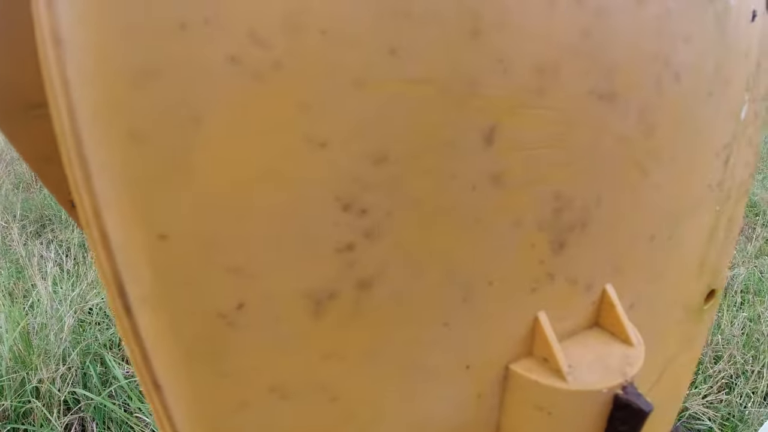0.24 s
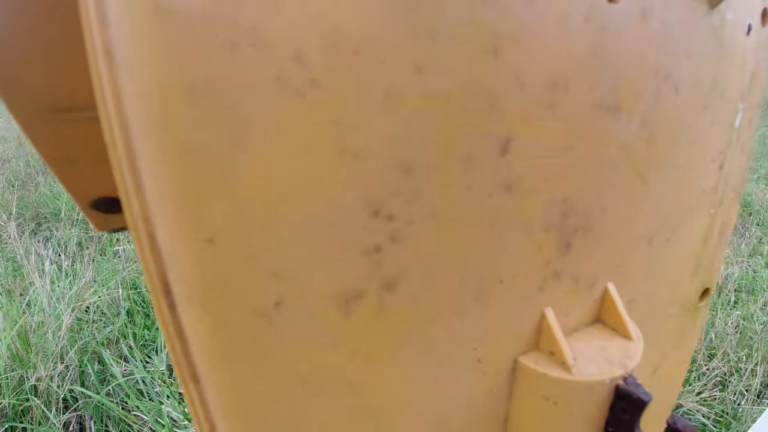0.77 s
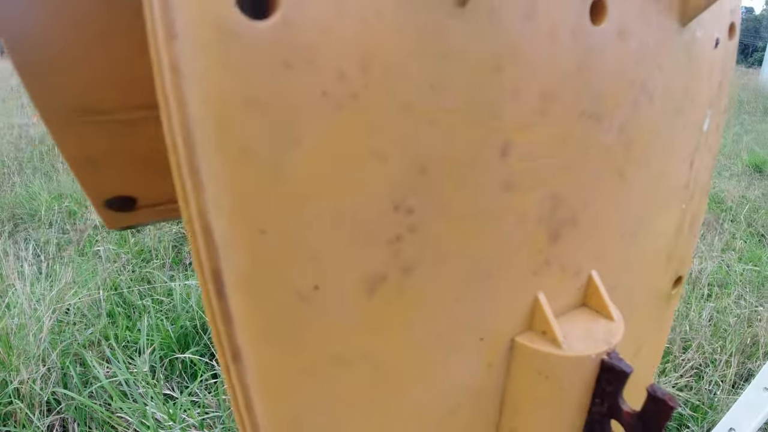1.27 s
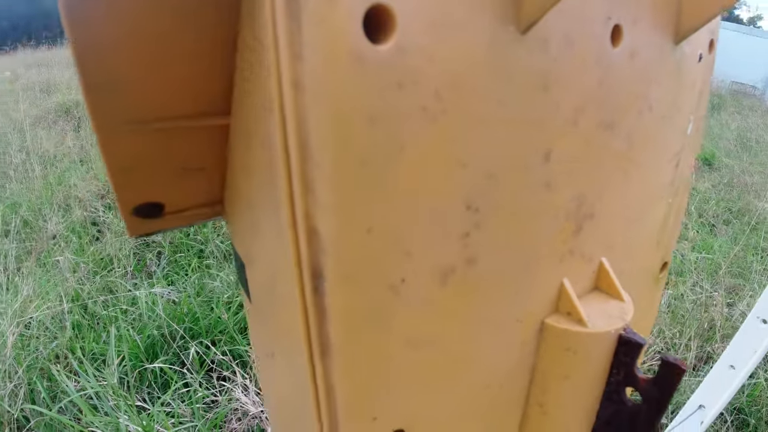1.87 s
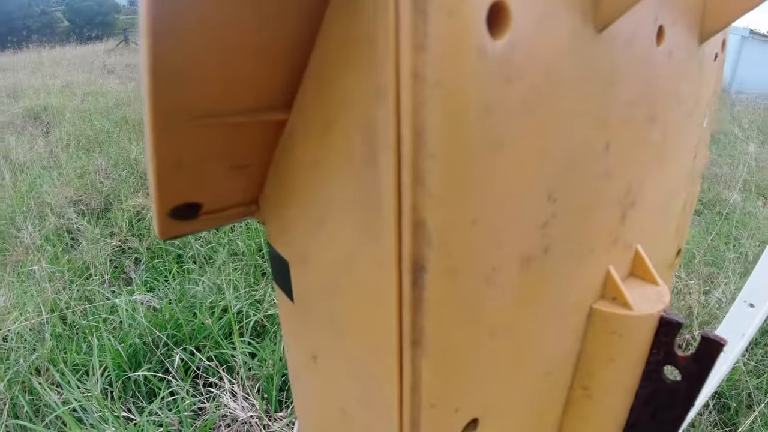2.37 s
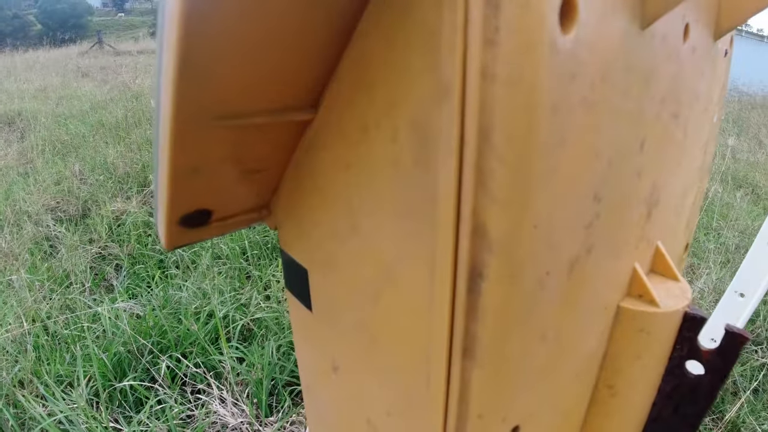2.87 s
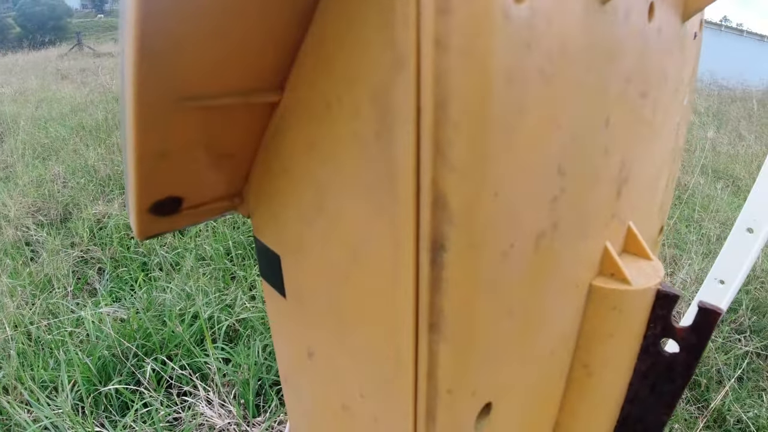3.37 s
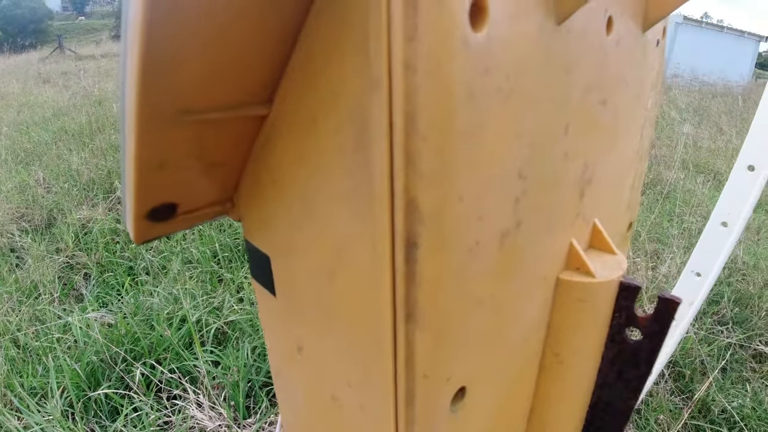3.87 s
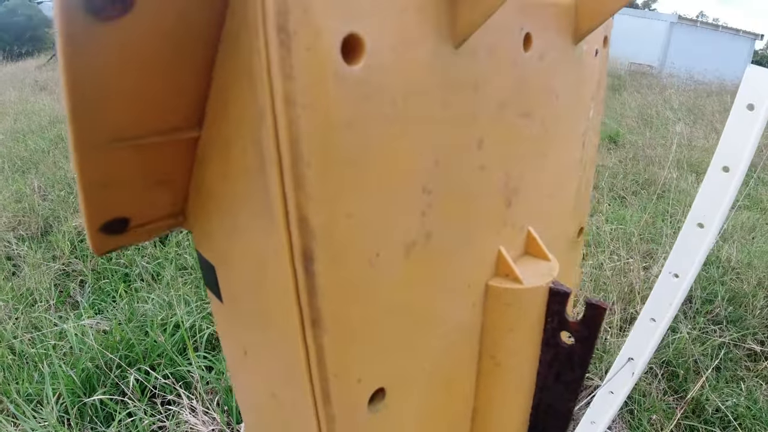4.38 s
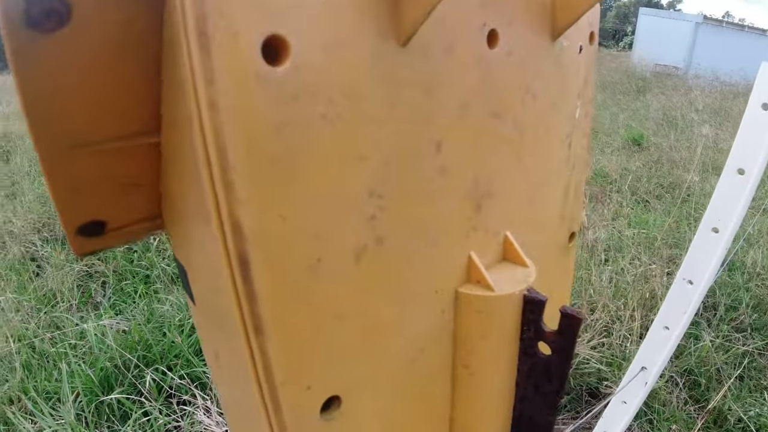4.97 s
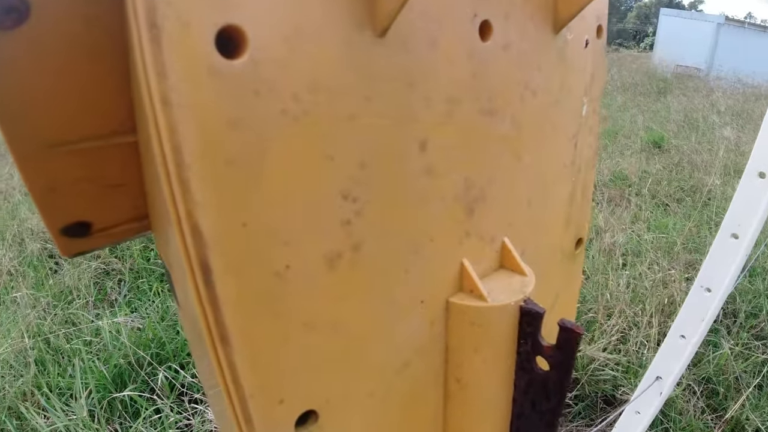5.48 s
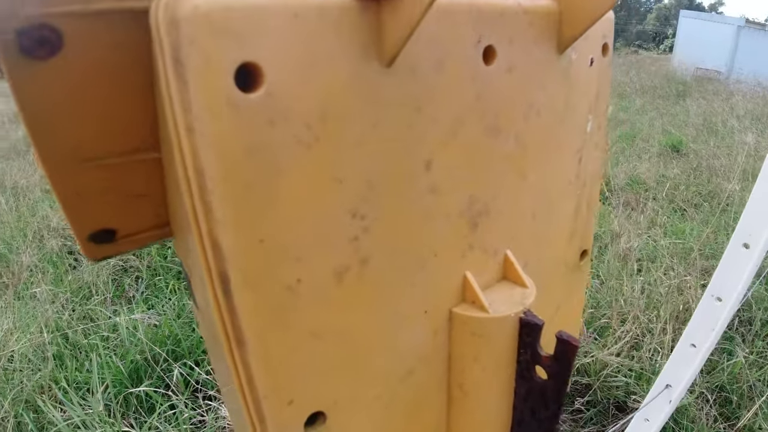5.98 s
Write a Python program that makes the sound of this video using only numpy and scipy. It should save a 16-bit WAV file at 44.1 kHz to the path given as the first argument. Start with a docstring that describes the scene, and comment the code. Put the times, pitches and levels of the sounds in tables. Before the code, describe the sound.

Close, dry electrical arcing in a hollow plastic case, outdoors in an open paddock with low wind rumble, soft air hiss and a faint low hum. From 0 to 0.9 seconds pops and bright cracks crowd together, single or in quick stutters of two to five strikes, with tiny ticks and sizzle trailing. From 1 to 2.4 they come in looser clusters with gaps; faint bird notes glide far off around 1.7 and 2.2. Stronger boxy pops fall between 2.4 and 3.3, with wind gusts at 2.7 and 3.2. It is nearly quiet until 3.9, only faint fizz and stray ticks. At 4.1 a dull low bump knocks the microphone amid hard double snaps. Dense, uneven crackling follows to 5.5, with gusts and a faint bird chirp near 5.1. Sparks thin, then the loudest pop strikes near 6.05 and a last one at 6.2.

```python
"""Wind rumble, a low hum and a faint fizz open the scene, and at once sparks pop close by.
An electric fence energiser arcs inside its hollow plastic case: pops and bright cracks, single or in
stuttering runs, are filtered noise and impulses driven through the resonances of the case.
Ticks and sizzle trail the sparks; wind, air and hum are coloured noise around them in the paddock.
A far bird gives thin gliding whistles, and decaying low sines knock the microphone in a single bump."""
import sys
import numpy as np
from scipy import signal
from scipy.fft import rfft, irfft, next_fast_len
from scipy.io import wavfile
from scipy.ndimage import map_coordinates

SR = 44100
rng = np.random.default_rng(int(sys.argv[2]) if len(sys.argv) > 2 else 0)


def store_wav(level_fs):
    """Save 16-bit WAV to argv[1]."""
    pcm = np.round(np.clip(np.atleast_2d(level_fs), -1, 1) * 32767)
    wavfile.write(sys.argv[1], SR, pcm.T.astype(np.int16))


N = 275184  # length in samples
RING = 8192  # samples in one ringing burst, also points in a random curve


def amp(db):
    """Level in dB as an amplitude factor."""
    return 10 ** (np.asarray(db) / 20)


def unit(x):
    """Scale to rms 1."""
    return x / np.sqrt(np.mean(x ** 2) + 1e-20)


def curves(rows):
    """One value per sample for each column after the time."""
    times, *columns = np.transpose(rows)
    return [np.interp(np.arange(N) / SR, times, column) for column in columns]


def filtered(x, response):
    """Filter x by a complex response of frequency."""
    size = next_fast_len(N + SR // 2)
    f = np.fft.rfftfreq(size, 1 / SR)
    return irfft(rfft(x, size) * response(f), size)[:N]


def noise(spectrum):
    """Noise of rms 1, coloured by straight lines over log frequency."""
    hz, db = np.transpose(spectrum)
    colour = lambda f: amp(np.interp(np.log(f + 1), np.log(hz + 1), db))
    return unit(filtered(rng.standard_normal(N), colour))


def wobble(per_second):
    """A smooth curve through so many random points a second."""
    return map_coordinates(rng.standard_normal(RING), [np.arange(N) * per_second / SR])


def resonance(f, hz, width):
    """Causal response of one damped mode."""
    return 1j * f * width / (hz * hz - f * f + 1j * f * width)


def add(track, s, sound):
    """Mix a sound in at s seconds."""
    start = max(round(s * SR), 0)
    room = track[start:start + len(sound)]
    room += sound[:len(room)]


def burst(spectrum):
    """The waveform of a spectrum, with the energy of 10 ms at rms 1."""
    wave = irfft(spectrum)
    return wave / np.sqrt(np.sum(wave ** 2) / (SR / 100))


# gusts on the microphone: [peak t/s, level over the breeze/dB, half-length t/s]
GUSTS = [(2.74, 11, 0.16), (3.17, 11.5, 0.049), (4.227, 12, 0.11), (4.712, 12.5, 0.086), (5.119, 14, .06),
         (5.736, 13, 0.16)]


def wind_strength(breeze_db=-35.5):
    """A steady breeze in dB, on which each gust swells and falls as a bell."""
    t = np.arange(N) / SR
    return breeze_db + sum(db * np.exp(-((t - s) / half) ** 2) for s, db, half in GUSTS)


# colour of the wind on the microphone: [f/Hz, relative level per Hz/dB]
WIND_COLOUR = [(4, -8.5), (11, -13), (22, -15.5), (33, -20), (45, -23.5), (62, -35.5), (140, -40),
               (260, -51), (600, -57), (2000, -130)]
# colour of the open air: [f/Hz, relative level per Hz/dB]
AIR_COLOUR = [(60, -9), (180, 5), (280, -6), (600, -5.5), (950, -8), (1400, -12.5), (2200, -14),
              (3400, -21), (5000, -21.5), (5800, -27), (8000, -36), (10000, -34.5), (13000, -27.5),
              (16000, -41)]


def paddock(air_db=-53, hum_hz=103, hum_width=6, hum_db=-52):
    """Wind rumble and open-air hiss are coloured noise; narrow-band noise makes a wavering hum."""
    wind = amp(wind_strength()) * noise(WIND_COLOUR)
    hum = unit(filtered(rng.standard_normal(N), lambda f: resonance(f, hum_hz, hum_width) ** 2))
    return wind + amp(air_db) * noise(AIR_COLOUR) + amp(hum_db) * hum


# resonances of the case and the air in it: [f/Hz, width f/Hz, relative level/dB]
CASE = [(195, 30, 4.35), (369, 28.5, 4.5), (473, 18, -4), (547.4, 24.5, 3), (680.3, 27.1, -3),
        (837.6, 45, -4.5), (941, 48.5, 0), (1063.5, 53, 1.17), (1135, 14, -17), (1290, 34, -5),
        (1481.5, 37, -7), (1850, 180, -17.5), (1789, 64, -2.5), (2066, 142, -0.5), (2249, 86, -1),
        (2723, 140, -14), (2720, 64, -11.5), (3262, 143, -5.5), (3825, 173, -11.5), (4290, 110, -16.5),
        (4926, 174, -14.5), (5940, 500, -40), (6430, 280, -27.5), (7120, 350, -34), (8420, 380, -31),
        (11200, 170, -38)]


def case_modes(f):
    """Damped modes of the case, one row each; neighbours move in opposite senses."""
    return np.array([(-1) ** k * amp(db) * resonance(f, hz, width)
                     for k, (hz, width, db) in enumerate(CASE)])


def crackle(per_second, life, steady, thin_hz, dull_hz):
    """Random noise grains, life seconds long, on a steady hiss, coloured by the case; rms 1."""
    starts = rng.random(N) < per_second / SR
    sizes = np.minimum(rng.exponential(size=N), 3)
    grains = steady + signal.lfilter([1], [1, -np.exp(-1 / (life * SR))], starts * sizes)

    def colour(f):
        low_cut = (1j * f / (thin_hz + 1j * f)) ** 3
        return case_modes(f).sum(0) * low_cut / (1 + (f / dull_hz) ** 4)

    return unit(filtered(grains * rng.standard_normal(N), colour))


# fizz between the sparks: [t/s, level before the fizz_db trim/dB]
FIZZ = [(0, -55), (.8, -51), (1.35, -60), (2.1, -54.5), (3.5, -61), (4.2, -52), (4.5, -61), (6.24, -58.5)]


def fizz(fizz_db=-3):
    """Tiny discharges sizzle in the case between the sparks."""
    level_db = curves(FIZZ)[0] + fizz_db
    return amp(level_db) * crackle(per_second=60, life=0.00085, steady=0.14, thin_hz=2940, dull_hz=6400)


# single sparks: [t/s, pop level over 10 ms/dB, pop f/Hz, crack level over 10 ms/dB]
SPARKS = [(.02, -18.5, 590, -34), (.0353, -29, 2400, -41), (.0498, -19.5, 930, -38.5),
          (.0646, -25, 900, -33), (.1014, -15.5, 690, -43), (.1377, -39, 3250, -40),
          (.1577, -14, 680, -26.5), (.269, -19, 650, -50), (.2925, -20, 670, -30.5),
          (.3489, -23, 1900, -49), (.5874, -18, 1320, -75), (.6021, -18.5, 1550, -37),
          (.773, -27, 1890, -38.5), (1.0522, -27, 625, -36.5), (1.0723, -33, 1620, -43.5),
          (1.1032, -42, 2180, -46), (1.1282, -28, 1300, -43), (1.1827, -18.5, 620, -29.5),
          (1.2018, -29, 1930, -35), (1.6404, -21, 710, -33.5), (1.6616, -17.5, 770, -30),
          (2.076, -22.5, 918, -46), (2.1442, -41, 2590, -46), (2.2738, -44.5, 3470, -64),
          (2.3744, -14, 856, -65), (2.3936, -25.5, 1270, -66), (2.635, -12.5, 830, -37.5),
          (2.668, -24, 1800, -45.5), (2.7775, -23.5, 1100, -44), (2.8156, -21, 745, -39),
          (2.912, -11, 1046, -34.5), (2.9542, -21.5, 2320, -40), (3.1173, -22.5, 760, -39),
          (3.1466, -27.5, 1070, -47), (3.1629, -27, 2070, -38), (3.2051, -22, 1970, -50),
          (3.281, -15.5, 735, -29.5), (3.3372, -36, 2770, -52), (3.8761, -43.5, 3200, -43),
          (4.013, -17, 820, -43), (4.0574, -25, 1520, -46), (4.3202, -16.5, 830, -39.5),
          (4.386, -24.5, 2010, -46), (4.7187, -24, 1020, -44), (4.822, -32.5, 2000, -47),
          (4.8885, -11, 1055, -33.5), (4.9238, -23, 2050, -47), (5.0708, -20.5, 826, -42),
          (5.1508, -13.5, 755, -37.5), (5.1775, -21, 1590, -46), (5.1978, -17.5, 626, -33.5),
          (5.2149, -22.5, 2180, -48), (5.2458, -19, 700, -36.5), (5.6324, -21.5, 710, -40.5),
          (5.6641, -34.5, 1660, -46), (5.706, -17.5, 985, -42), (5.8474, -26.5, 1550, -41),
          (5.9656, -13.5, 867, -54), (6.0537, -7.5, 833, -32), (6.2113, -13, 527, -33)]
# stuttering runs, in which the arc strikes again and again: [t/s, strikes, gap t/s,
# first pop level/dB, level swell per strike/dB, first pop f/Hz, crack level/dB]
RUNS = [(0.1797, 4, .0101, -14.5, 1.4, 670, -36.5), (.436, 2, .007, -16, 5, 880, -35),
        (0.4665, 5, .008, -18.5, -0.14, 910, -32.5), (0.5347, 2, .007, -17.5, 4.5, 830, -37.5),
        (0.676, 2, .006, -14, -3, 734, -34), (0.7273, 2, .0102, -21, 6.5, 800, -38.5),
        (0.815, 2, 0.0091, -20, 2, 980, -41.5), (1.232, 3, .0124, -15.5, .5, 800, -36),
        (1.5657, 2, 0.009, -22.5, 0, 1540, -49), (1.6764, 2, 0.00714, -11, -10, 635, -44),
        (1.8595, 2, .0075, -20.5, -3, 910, -46.5), (2.4731, 2, .0137, -19.5, 0, 996, -50.5),
        (4.1049, 2, 0.00443, -12, -2, 727, -33.5), (4.1246, 2, .008, -14, -21, 760, -35),
        (4.1723, 3, .008, -15, -1.5, 674, -42), (4.2323, 2, 0.018, -12, -11.5, 610, -37.5),
        (4.2811, 2, .0045, -11.5, -8.5, 648, -35), (4.5357, 2, .0095, -23.5, 9.5, 757, -41.5),
        (4.5581, 2, .0105, -13.5, -6.5, 705, -38), (4.6161, 2, .0153, -15, -2.5, 700, -32.5),
        (4.7864, 2, 0.00788, -17, 2.5, 944, -50), (4.9514, 3, .0115, -17.5, 1, 893, -38),
        (5.293, 2, .0114, -18, 0.5, 780, -35), (5.4118, 4, .0064, -26.5, 5.5, 830, -34),
        (5.4386, 4, .012, -17, -2, 920, -37.5), (5.7545, 2, .013, -21.5, 1.5, 1400, -42.5),
        (6.0144, 2, .0134, -12.5, -6, 646, -38)]


def strikes(climb=1.084):
    """Every breakdown of the gap; a run repeats evenly, each pop higher by the climb ratio."""
    repeated = [(s + k * gap, db + k * swell_db, hz * climb ** k, crack_db)
                for s, count, gap, db, swell_db, hz, crack_db in RUNS
                for k in range(round(count))]
    return SPARKS + repeated


# sharpness of a pop whose level equals its crack: [pop f/Hz, base Q]
SHARPNESS = [(500, 1.36), (740, 1.46), (950, 2.6), (1400, 1.28), (2300, 2.3)]


def sharpness(hz, over_crack_db, soft_rings=0.16):
    """Q of a pop: an abrupt spark with a strong crack is broad, a soft one rings."""
    base_q = np.interp(hz, *np.transpose(SHARPNESS))
    return base_q * amp(soft_rings * over_crack_db)  # soft_rings in dB of Q per dB over the crack


def sparks(scatter_db=3.0, sputter_life=0.005, sputter_db=-10, crack_life=0.0017, crack_hz=3600,
           crack_top_hz=8000, leak_db=-10.0, leak_hz=1150, leak_width=1100, dull_hz=9000, steep=1.316):
    """Each spark is a short pop of heated air plus a bright crack, both heard through the case."""
    f, t = np.fft.rfftfreq(RING, 1 / SR), np.arange(RING) / SR
    modes, out = case_modes(f), np.zeros(N)
    # part of the sound comes straight through the seams, without ringing
    leak = amp(leak_db) * resonance(f, leak_hz, leak_width) / (1 + 1j * f / crack_hz)
    wall = 1 / (1 + 1j * f / dull_hz) ** 2
    bright = (1j * f / (crack_hz + 1j * f)) ** 3 / (1 + 1j * f / crack_top_hz)
    for s, db, hz, crack_db in strikes():
        q = sharpness(hz, db - crack_db)
        # each spark drives the modes a little differently
        drive = amp(scatter_db * rng.standard_normal(len(CASE)))
        case = (drive @ modes + leak) * wall
        pop = burst(resonance(f, hz, steep * hz / max(q, .5)) ** steep * case)
        # after the breakdown the arc sputters for a moment, rough and broad around the same pitch
        flicker = rfft(rng.standard_normal(RING) * np.exp(-t / sputter_life))
        sputter = amp(sputter_db) * burst(flicker * resonance(f, hz, hz) ** 2 * case)
        snap = rng.standard_normal(RING) * np.sqrt(t) * np.exp(-t / crack_life)
        crack = burst(rfft(snap) * bright * case)
        add(out, s, amp(db) * (pop + sputter) + amp(crack_db) * crack)
    return out


def heat(pops, linger):
    """The recent strength of the sparks, its power fading over linger seconds."""
    keep = np.exp(-1 / (linger * SR))
    return np.sqrt(np.abs(signal.lfilter([1 - keep], [1, -keep], pops ** 2)))


def afterglow(pops, ticks_db=-34, sizzle_db=-47, sizzle_hz=7000, sizzle_width=4500, spit_db=4, spits=250):
    """The gap stays ionised after a spark: it spits a few more ticks and sizzles a little longer."""
    ticks = crackle(per_second=130, life=0.0022, steady=0.035, thin_hz=4700, dull_hz=7550)
    hiss = filtered(rng.standard_normal(N), lambda f: resonance(f, sizzle_hz, sizzle_width) ** 2)
    sizzle = unit(hiss * amp(spit_db * wobble(spits)))  # spits per second
    short = amp(ticks_db) * heat(pops, linger=0.0021) * ticks
    return short + amp(sizzle_db) * heat(pops, linger=0.037) * sizzle


def strays(count=45, tick_db=-55, spread_db=3, tick_hz=3400, q=3):
    """Now and then a lone, weak discharge ticks high in the case."""
    f, out = np.fft.rfftfreq(RING, 1 / SR), np.zeros(N)
    case = case_modes(f).sum(0)
    times = rng.random(count) * N / SR
    variations = np.clip(rng.standard_normal((count, 2)), -2, 2)
    for s, (size, pitch) in zip(times, variations):
        hz = tick_hz * np.exp(.22 * pitch)
        tick = burst(resonance(f, hz, hz / q) ** 2 * case)
        add(out, s, amp(tick_db + spread_db * size) * tick)
    return out


def surroundings(x, t60, wet_db, build=.01):
    """A diffuse tail of scattered sound builds up and dies away, by 60 dB in t60 seconds."""
    t = np.arange(SR // 2) / SR
    tail = rng.standard_normal(len(t)) * amp(-60 * t / t60) * (1 - np.exp(-t / build))
    return amp(wet_db) * signal.fftconvolve(x, tail / np.linalg.norm(tail))[:N]


# far bird notes: [t/s, length t/s, start f/Hz, middle f/Hz, end f/Hz, relative level/dB]
BIRD = [(1.715, 0.03, 5000, 5200, 4300, -58.5), (1.74, 0.017, 3240, 3030, 3120, -44),
        (2.183, 0.27, 2970, 3150, 3420, -59.5), (2.307, 0.074, 4800, 4500, 4360, -59),
        (4.25, 0.017, 3020, 2970, 3160, -44), (5.094, 0.053, 2760, 2950, 3150, -55)]


def bird(flutter_db=4, flutter_hz=70):
    """Thin whistles from far off: sines on curved glides, fluttering in level."""
    out = np.zeros(N)
    for s, length, start_hz, middle_hz, end_hz, db in BIRD:
        u = np.linspace(0, 1, int(length * SR))
        glide = np.polyfit([0, .5, 1], [start_hz, middle_hz, end_hz], 2)
        whistle = np.sin(2 * np.pi * np.cumsum(np.polyval(glide, u)) / SR)
        swell = np.sqrt(np.abs(np.sin(np.pi * u)))
        add(out, s, amp(db) * swell * whistle)
    return out * amp(flutter_db * wobble(flutter_hz))


# knocks on the microphone: [t/s, level before the soft rise/dB, f/Hz, 60 dB decay t/s]
BUMPS = [(4.068, -5, 130, 0.11), (4.093, -3, 61.5, 0.14), (4.11, -11, 38, 0.37)]


def bumps(rise=0.018):
    """A soft knock on the microphone rings low and briefly, rising over rise seconds."""
    out, t = np.zeros(N), np.arange(SR // 2) / SR
    for s, db, hz, t60 in BUMPS:
        envelope = amp(db - 60 * t / t60) * (1 - np.exp(-t / rise))
        add(out, s, envelope * np.sin(2 * np.pi * hz * t))
    return out


def scene():
    """The arcing case in front, the paddock around it."""
    pops, calls = sparks(), bird()
    arcing = pops + afterglow(pops) + fizz() + strays()
    far = amp(3) * calls + surroundings(calls, t60=.35, wet_db=-19)
    # the parts inside the case blur each snap; grass and post add a much weaker tail
    inside = surroundings(arcing, t60=0.036, wet_db=-15.5)
    outside = surroundings(arcing, t60=0.14, wet_db=-25)
    return (arcing + inside + outside + far + bumps() + paddock())[None]


def record(dry, treble_hz=10500, top_hz=16200):
    """The recorder rounds off the highest peaks, loses the top treble and stops dead at top_hz."""
    rounded = dry[0] / (1 + np.abs(dry[0]) ** 12) ** (1 / 12)
    return filtered(rounded, lambda f: (f < top_hz) / np.sqrt(1 + (f / treble_hz) ** 12))[None]


dry = scene()
out = record(dry)
store_wav(out)
```